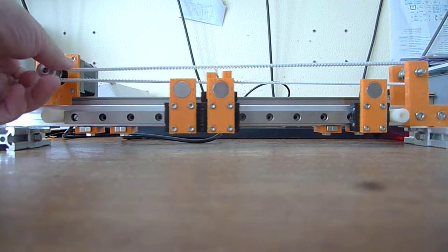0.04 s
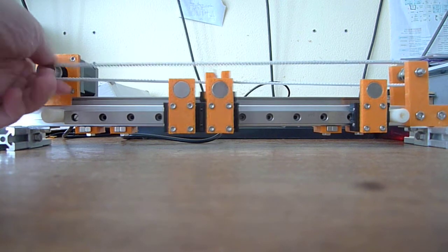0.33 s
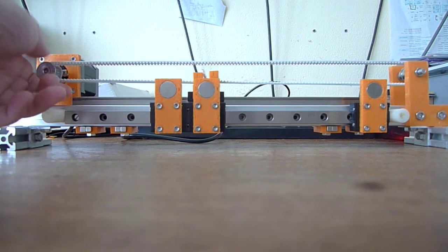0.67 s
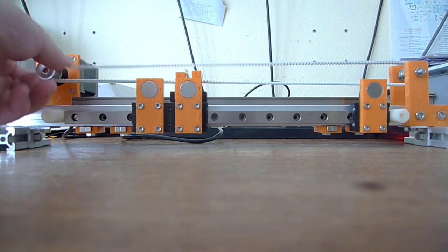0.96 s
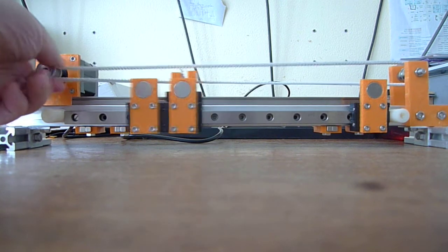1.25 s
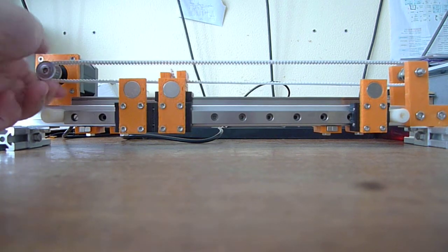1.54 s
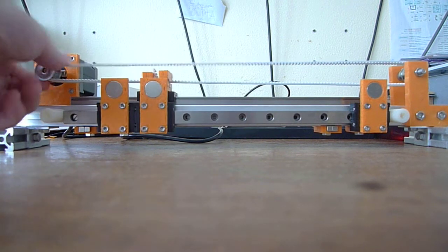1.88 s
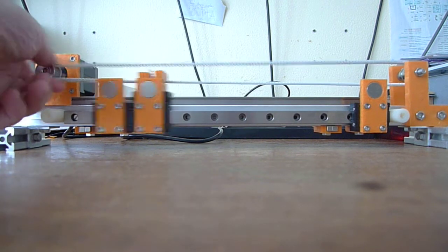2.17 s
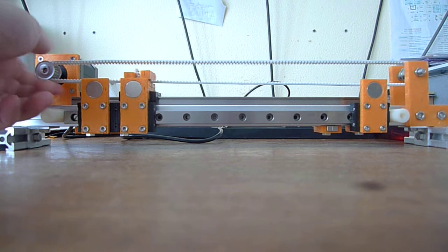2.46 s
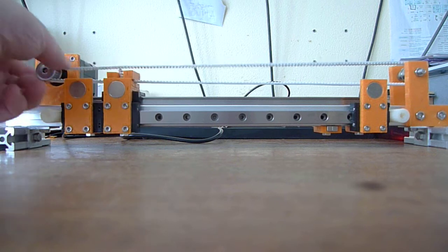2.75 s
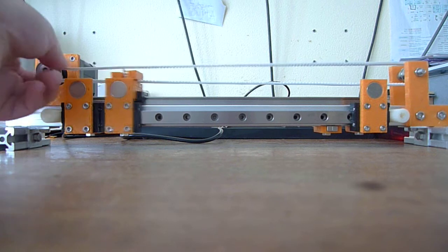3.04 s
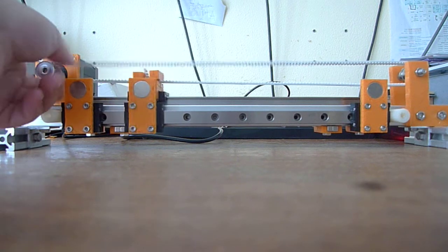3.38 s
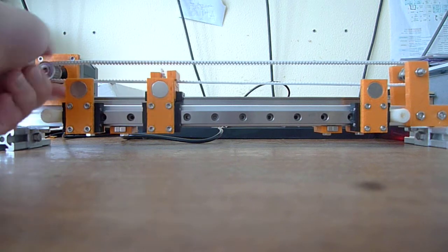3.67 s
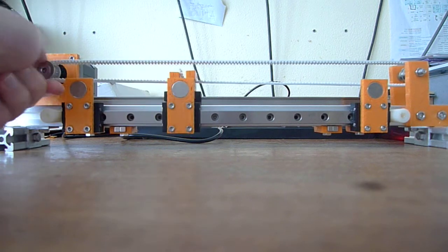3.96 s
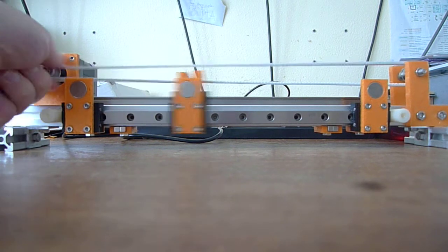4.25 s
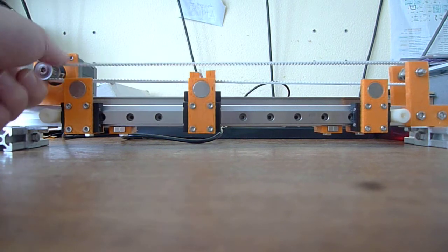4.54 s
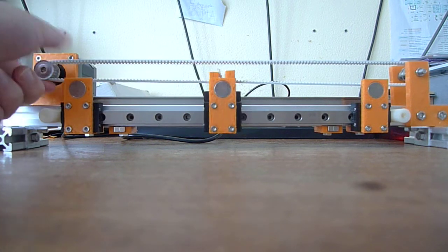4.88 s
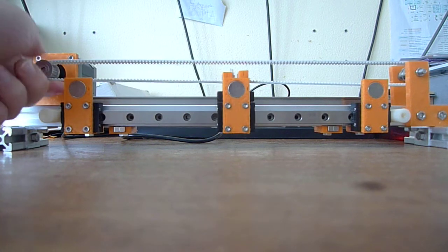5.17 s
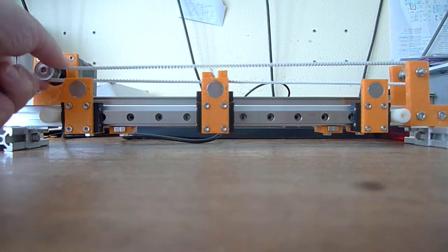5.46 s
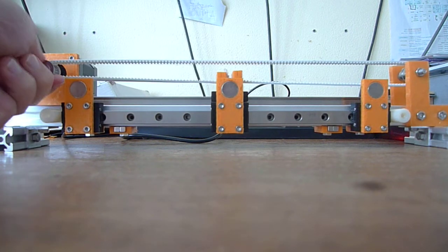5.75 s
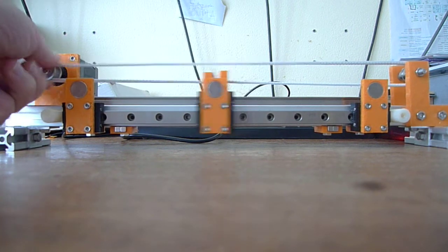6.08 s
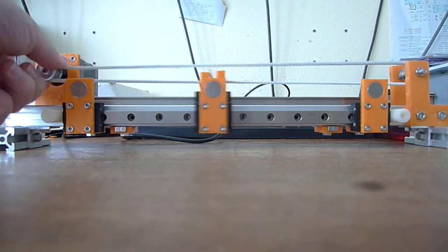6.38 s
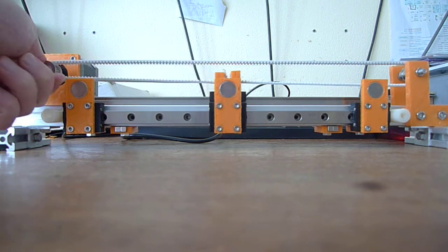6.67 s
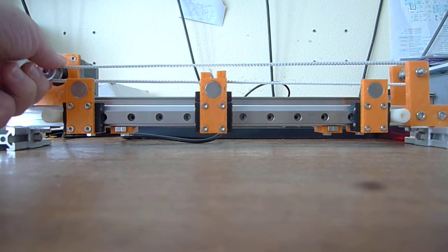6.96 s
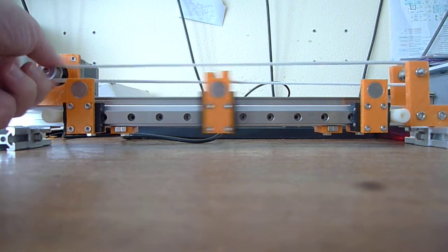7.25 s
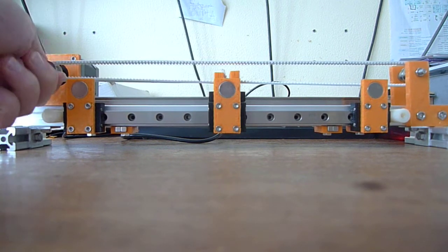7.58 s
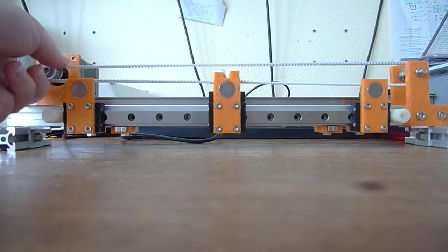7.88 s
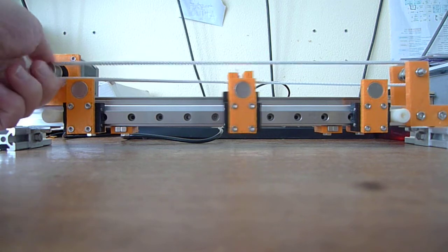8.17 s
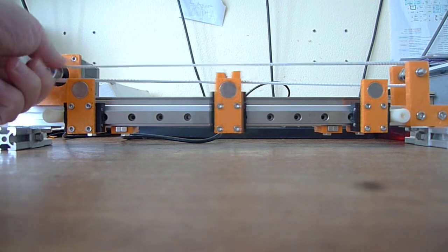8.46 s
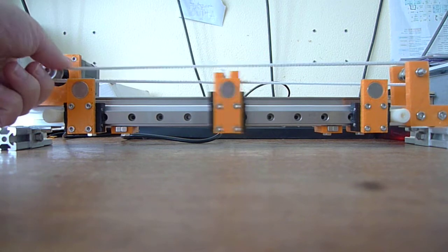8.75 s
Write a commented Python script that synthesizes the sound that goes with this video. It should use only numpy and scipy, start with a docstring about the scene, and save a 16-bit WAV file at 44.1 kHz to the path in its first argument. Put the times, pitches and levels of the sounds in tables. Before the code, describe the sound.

In a small room, a toothed belt drive is turned by hand in quick spurts. The motor makes brief zipping tones that sweep up and down while the belt rumbles and carriages rattle along a metal rail. Sharp knocks come now and then early on, the motor judders most near the middle, and one more soft knock comes late. A faint hum and hiss lie underneath.

```python
"""From the start, fingers twist the pulley of an unpowered stepper motor in short turns. With each twist
the rotor's magnetic bumps (cogging) make a tone that sweeps up and down through the frame's resonances,
a toothed belt rumbles, and bearing balls rattle as it drags carriages along a steel rail on a desk.
From about 1 to 4 seconds the carriages knock together now and then. The motor judders most near 4 seconds,
then runs more smoothly, with one more knock near 8. A small room, a low hum and hiss are heard all along."""
import sys
import numpy as np
from scipy import signal
from scipy.fft import rfft, irfft, next_fast_len
from scipy.io import wavfile
from scipy.ndimage import uniform_filter1d

SR = 44100
rng = np.random.default_rng(int(sys.argv[2]) if len(sys.argv) > 2 else 0)


def pcm_store(signal):
    """Save signal as 16-bit PCM."""
    levels = np.round(np.clip(np.atleast_2d(signal), -1, 1) * 32767)
    wavfile.write(sys.argv[1], SR, levels.astype(np.int16).T)


N = 388962
TIME = np.arange(N) / SR

# The notes a carriage rings with. Each row: pitch in Hz, level in dB, seconds to fade by 60 dB.
CARRIAGE_NOTES = [(950, -9.5, 0.011), (1180, -19.5, 0.032), (1746, -9, 0.032), (2240, -12.5, 0.022),
                  (2275, -3.5, 0.017), (2500, -4, 0.017), (2763, -3, .018), (2995, -15, 0.061),
                  (3017, -17.5, 0.067), (3150, -19.5, 0.077), (3270, -18, 0.1), (3410, -20.5, 0.052),
                  (3580, -20, 0.041), (3735, -11, 0.013), (4300, -10.5, 0.0057)]


def motor(rate_hz, half_db=-0.5, double_db=-16, wobble=0.0565):
    """The rotor snaps past its magnetic resting spots: a tone, with weaker ones an octave down and up."""
    # The rotor judders most while both carriages are dragged. Each row: time in seconds, roughness 0 to 1.
    judder = [(0, 0.25), (1.3, 0.25), (2.7, 0.37), (3.1, 0.48), (3.9, .6), (5.0, 0.51), (5.7, 0.2),
              (6.2, 0.14), (8.82, 0.22)]
    # The motor sings out at the frame's main resonances. Each row: cogging rate in Hz, gain in dB.
    gain_by_rate = [(150, -2.5), (290, -3), (435, 1.2), (525, -1.5), (625, 1.5), (740, -2), (900, -1.5),
                    (1250, -2.3)]
    rough = np.interp(TIME, *np.transpose(judder))
    phase = 2 * np.pi * np.cumsum(rate_hz * (1 + wobble * rough * drift(250))) / SR
    torque = np.sin(phase) + from_db(half_db) * np.sin(phase / 2) + from_db(double_db) * np.sin(2 * phase)
    torque *= 1 + rough * drift(300)
    tone = evened(frame(torque), window_s=0.025, slack=0.032)
    return tone * from_db(np.interp(rate_hz, *np.transpose(gain_by_rate)))


def belt(boom_db, boom_hz=194, flutter_db=0.97):
    """Belt teeth seat unevenly on the pulley and shake the frame, at times with more low boom."""
    # The tone of the teeth's push. Each row: frequency in Hz, level in dB.
    spectrum = [(40, 3), (80, -33.5), (130, 7.5), (250, 7.5), (450, -10.5), (680, -14), (800, -14),
                (1300, -26)]
    force = coloured(grains(900, spread_db=0.5), spectrum)
    low = signal.sosfiltfilt(signal.butter(6, boom_hz, fs=SR, output="sos"), force)
    rumble = evened(frame(force + (from_db(boom_db) - 1) * low), window_s=0.048, slack=0.18)
    return rumble * from_db(flutter_db * drift(55))


def bearings(rate_hz, ring_share=0.27, flutter_db=1.9):
    """Balls jostle in their tracks, more often the faster the carriage slides, and set it ringing."""
    # The tone of the rattle. Each row: frequency in Hz, level in dB.
    spectrum = [(300, 4), (700, 1), (900, -1.5), (1250, -0.5), (1700, -0.5), (2200, -4.5), (2600, -8.5),
                (3100, -4.5), (3800, -6), (4500, -15.5), (5300, -34), (8000, -51.5)]
    ticks_per_s = 600 + 2.5 * rate_hz
    ticks = rms_one(grains(ticks_per_s, spread_db=2.5) / np.sqrt(ticks_per_s))
    ringing = rms_one(sum(from_db(db) * ring(ticks, hz, fade_s) for hz, db, fade_s in CARRIAGE_NOTES))
    return coloured(ticks + ring_share * ringing, spectrum) * from_db(flutter_db * drift(170))


def knocks(ring_db=-4.5, thud_db=40.0, contact_s=0.00036, dull_hz=4600, bounce_s=0.0016, bounce_db=-6.5):
    """Each knock chatters for a moment, rings the carriage and thuds into the frame."""
    # Carriages and pulley knocking. Each row: start in seconds, level in dB, extra thud in dB,
    # brightness in dB per octave.
    hits = [(1.3432, -33, -10, -8.5), (1.7131, -41.5, 13, -3), (1.8276, -23, -4, 5), (2.225, -34.5, 6, -18),
            (2.2575, -25, 5.5, 5.5), (2.692, -29.5, 8.5, -5), (2.7072, -25, -1.5, -10.5),
            (3.028, -37, 5, 0), (3.0613, -37.5, 8, 6.5), (3.4746, -48, -1, 19), (3.514, -46, 5, 3),
            (3.836, -51, 16, -1), (4.234, -55, -19, 3), (7.682, -44, 6, -11)]
    start_s, level_db, extra_thud_db, brightness = np.transpose(hits)
    touches = np.arange(4)  # the first touch, then three quick, weaker bounces
    jitter = rng.uniform(-0.35, 0.3, (len(hits), len(touches))) * (touches > 0)
    at = ((start_s[:, None] + bounce_s * (touches + jitter)) * SR).astype(int)
    sound = np.zeros(N)
    for hz, db, fade_s in CARRIAGE_NOTES:
        strength_db = level_db + db + ring_db + brightness * np.log2(hz / 2200)
        clicks = np.zeros(N)
        clicks[at] = from_db(strength_db[:, None] + bounce_db * touches) * rng.choice([-1, 1], at.shape)
        sound += ring(clicks, hz, fade_s)
    push = np.zeros(N)
    push[at[:, 0]] = from_db(level_db + extra_thud_db + thud_db)
    soft = np.exp(-1 / (contact_s * SR))  # plastic faces soften the blow
    sound += frame(signal.lfilter([1 - soft], [1, -soft], push))
    return signal.sosfilt(signal.butter(6, dull_hz, fs=SR, output="sos"), sound)


def frame(force, low_hz=117, high_hz=669):
    """Frame and desk sound hollow, in a narrow band; the steel rail rings faintly above it."""
    # Resonances of the frame with the desk, and of the rail. Each row: pitch in Hz, width in Hz, gain in dB.
    frame_notes = [(137.2, 8, -1), (181, 5.7, 1.5), (219, 73, -12.5), (258.5, 6.7, -1.5), (315.6, 26, -6),
                   (349.7, 16, -3.5), (435.9, 30, 5.5), (484, 15, -0.5), (552.4, 71, -6.5), (603, 27, 0.5),
                   (628.6, 60, -5.5), (662, 5.1, -15)]
    rail_notes = [(1248, 41, -1), (1370, 260, -12), (1710, 90, -31)]
    cut_lows = signal.butter(3, low_hz, "high", fs=SR, output="sos")
    cut_highs = signal.butter(8, high_hz, fs=SR, output="sos")
    hollow = signal.sosfilt(np.vstack([cut_lows, cut_highs]), resonances(force, frame_notes))
    return hollow + resonances(force, rail_notes)


def cogging_rate(top_s, top_hz, rise_s, fall_s, creep_hz=92.44, roundness=2.05):
    """Magnetic bumps per second: a rounded hump for each twist, and a slow creep in between."""
    t, rate = TIME[::20], creep_hz
    for s, hz, rise, fall in zip(top_s, top_hz, rise_s, fall_s):
        away = np.abs((t - s) / np.where(t < s, rise, fall))
        hump = np.exp(-np.minimum(away, 10) ** roundness)
        rate = np.maximum(rate, creep_hz + (hz - creep_hz) * hump)
    return np.interp(TIME, t, rate)


def swell(top_s, level_db, before_s, after_s, rise_db_per_s, fall_db_per_s, rest_db, lean_db=0):
    """A gain that rises, holds from before_s ahead of each top speed to after_s past it, then falls."""
    t, db = TIME[::20], rest_db
    for s, full_db, before, after, lean in np.broadcast(top_s, level_db, before_s, after_s, lean_db):
        early, late = np.maximum(s - before - t, 0), np.maximum(t - s - after, 0)
        tilt_db = lean * np.clip((t - s) / 0.012, -1, 1)  # complete 12 ms either side of top speed
        db = np.maximum(db, full_db + tilt_db - rise_db_per_s * early - fall_db_per_s * late)
    return np.interp(TIME, t, from_db(db))


def room(x, echo_db, fade_s=0.28):
    """Dense echoes from the desk and near walls die away."""
    t = TIME[:SR // 2]
    tail = rng.standard_normal(len(t)) * from_db(-60 * t / fade_s) * (t > 0.003)
    return x + from_db(echo_db) * signal.fftconvolve(x, tail / np.linalg.norm(tail))[:N]


def background(noise_db=-51.5):
    """Room rumble, microphone hiss, a steady hum and a faint electrical whine."""
    # The hum and whine. Each row: pitch in Hz, average level in dB.
    tones = [(52, -66), (4389, -79.5), (6222, -89.5)]
    # The tone of the rumble and hiss. Each row: frequency in Hz, relative level in dB.
    spectrum = [(20, -49.5), (40, 3), (56, 6), (90, -0.5), (190, 6), (300, 0.5), (470, -1), (600, -0.5),
                (740, -4.5), (1500, -9.5), (3200, -13.5), (4400, -23.5), (7500, -24), (8300, -29)]
    hum = sum(from_db(db) * np.sqrt(2) * np.sin(2 * np.pi * (hz * TIME + rng.random())) for hz, db in tones)
    return hum + from_db(noise_db) * coloured(rng.standard_normal(N), spectrum)


def from_db(db):
    """Turn decibels into a gain."""
    return 10 ** (np.asarray(db) / 20)


def rms_one(x):
    """Scale a signal to an average power of 1."""
    return x / np.sqrt(np.mean(x ** 2) + 1e-20)


def coloured(x, spectrum):
    """Shape a signal's lows and highs along a curve of (Hz, dB) points; its power comes out as 1."""
    hz, db = np.transpose(spectrum)
    size = next_fast_len(N)
    bins_hz = np.maximum(np.fft.rfftfreq(size, 1 / SR), 1)
    gain = from_db(np.interp(np.log(bins_hz), np.log(hz), db))
    return rms_one(irfft(rfft(x, size) * gain, size)[:N])


def drift(per_s):
    """A random wander, about 1 in size, that changes course per_s times a second."""
    points = rng.standard_normal(N // 10)
    return rms_one(np.interp(TIME * per_s, np.arange(len(points)), points))


def grains(per_s, spread_db):
    """Tiny impacts of uneven size at random moments."""
    sizes = from_db(spread_db * np.minimum(rng.exponential(1, N), 4)) * rng.choice([-1, 1], N)
    return sizes * (rng.random(N) < per_s / SR)


def ring(x, hz, fade_s):
    """Each click starts a pure tone that fades by 60 dB in fade_s seconds."""
    decay, step = from_db(-60 / (fade_s * SR)), 2 * np.pi * hz / SR
    return signal.lfilter([0, np.sin(step)], [1, -2 * decay * np.cos(step), decay ** 2], x + 1e-18)


def resonances(force, notes):
    """One force shakes several resonances side by side, with dips between them."""
    sound = np.zeros(N)
    for hz, width_hz, db in notes:
        decay = np.exp(-np.pi * width_hz / SR)
        gain = (1 - decay ** 2) / 2 * from_db(db)
        feedback = [1, -2 * decay * np.cos(2 * np.pi * hz / SR), decay ** 2]
        sound += signal.lfilter([gain, 0, -gain], feedback, force + 1e-18)
    return sound


def evened(x, window_s, slack):
    """Even out the loudness, but keep the brief swell at each resonance."""
    x = rms_one(x)
    local_power = uniform_filter1d(x ** 2, int(window_s * SR))
    return x * np.sqrt((1 + slack) / (local_power + slack))


def scene():
    """The twists drive motor, belt and bearings; they and the knocks sound in the same small room."""
    # Twists of the pulley, a few in two pushes. Each row: time of top speed in seconds, top cogging rate
    # in Hz, seconds speeding up, seconds slowing down, motor level in dB, its lean in dB (above 0, fingers
    # press harder late), belt level in dB, bearing level in dB, belt boom in dB, seconds the belt is taut
    # before top speed, seconds it shudders after.
    twists = [(0.007, 503.0, 0.038, 0.023, -28.5, -6.5, -37.5, -50, -1.5, 0.03, 0.067),
              (0.404, 606.0, 0.06, 0.055, -33.5, 2.5, -36.5, -47.5, -14, 0.0088, 0.081),
              (0.844, 840.0, 0.05, 0.038, -32, -0.5, -38, -43, -2.3, 0.054, 0.066),
              (1.254, 457.0, 0.018, 0.056, -32.5, 1.5, -36.5, -48.5, -9, 0.013, 0.085),
              (1.364, 729.3, 0.059, 0.034, -32.5, 1.5, -38.5, -45.5, 4.5, 0.055, 0.049),
              (1.731, 742.6, 0.051, 0.055, -34.5, -2.5, -36, -42, -9, 0.051, 0.097),
              (2.204, 690.7, 0.04, 0.031, -33, -1, -47, -44.5, -1, 0.06, 0.01),
              (2.249, 1038, 0.04, 0.023, -32.5, 4.5, -37.5, -39, -3.5, 0.027, 0.066),
              (2.657, 647, 0.026, 0.03, -31.5, 1.5, -40, -45, -7, 0.031, 0.01),
              (2.697, 1084, 0.04, 0.034, -30, 3.5, -32.5, -40, -13.5, 0.011, 0.053),
              (3.036, 718.0, 0.013, 0.045, -35, -2, -42, -64, -3.8, 0.0052, 0.06),
              (3.101, 592.0, 0.042, 0.084, -32.5, -1.5, -33.5, -41.5, -5, 0.039, 0.06),
              (3.288, 269.0, 0.029, 0.021, -39.5, -1, -49, -68, 2.7, 0.031, 0.15),
              (3.494, 829.0, 0.031, 0.03, -31.5, -3, -31.5, -42, -12, 0.027, 0.059),
              (3.565, 478.0, 0.044, 0.043, -33, -1, -43, -51.5, 8, 0.04, 0.096),
              (3.887, 544.0, 0.028, 0.092, -40.0, -1, -30, -43, -16, 0.038, 0.013),
              (4.288, 1236.0, 0.038, 0.029, -31, -1, -42, -40.4, -5.5, 0.064, 0.096),
              (4.416, 252.0, 0.024, 0.031, -55, 2, -45.5, -64.3, -2.5, 0.024, 0.025),
              (4.657, 555.0, 0.038, 0.095, -34, -0.5, -41.5, -44, -9, 0.032, 0.057),
              (5.03, 562.0, 0.033, 0.037, -37.5, 2.5, -38, -45.5, 2.3, 0.03, 0.092),
              (5.363, 214.0, 0.019, 0.019, -46, 9, -39, -63, 4, 0.01, 0.019),
              (5.433, 1259.0, 0.037, 0.043, -31.5, -1.5, -33, -41.5, -4, 0.046, 0.045),
              (5.66, 696.0, 0.048, 0.054, -38, 3.5, -37.3, -47, 0, 0.024, 0.067),
              (5.887, 707.0, 0.036, 0.043, -37.5, -3.5, -37.5, -49, -6.5, 0.016, 0.058),
              (5.937, 549.0, 0.032, 0.041, -34, -1, -38, -49.5, 7, 0.029, 0.073),
              (6.151, 657.7, 0.068, 0.053, -36.5, 4, -38.5, -49, 5, 0.056, 0.073),
              (6.368, 894.0, 0.045, 0.032, -31, 1.5, -36.8, -44.5, -1, 0.039, 0.064),
              (6.593, 776.0, 0.048, 0.047, -39, 3, -40.2, -47.5, 0.5, 0.053, 0.071),
              (6.829, 811.0, 0.046, 0.028, -35.0, -0.5, -37.5, -47.1, -10.5, 0.037, 0.051),
              (7.064, 691.0, 0.044, 0.049, -37, 0.5, -42, -49.5, 0.7, 0.049, 0.075),
              (7.271, 882.0, 0.039, 0.033, -34, -0.5, -43.5, -46.5, -3.5, 0.043, 0.086),
              (7.501, 810.0, 0.04, 0.033, -38, -1, -38.5, -48.5, 4.3, 0.055, 0.04),
              (7.777, 185.0, 0.026, 0.031, -45.5, -3, -50, -73, 1.5, 0.031, 0.027),
              (7.993, 806.0, 0.036, 0.045, -35.5, -2, -39, -48.5, 4.5, 0.037, 0.074),
              (8.243, 617.0, 0.054, 0.06, -35.5, 0.5, -39.5, -49.5, 3.5, 0.056, 0.11),
              (8.494, 899.0, 0.042, 0.038, -34, 2, -43, -47, -2.7, 0.049, 0.088),
              (8.709, 928.0, 0.054, 0.034, -33, -1, -38.5, -47, 1.2, 0.062, 0.059),
              (8.782, 473.0, 0.037, 0.057, -41.2, -5, -43, -68, 10, 0.044, 0.06)]
    (top_s, top_hz, rise_s, fall_s, motor_db, lean_db,
     belt_db, bearing_db, boom_db, taut_s, shudder_s) = np.transpose(twists)
    rate_hz = cogging_rate(top_s, top_hz, rise_s, fall_s)
    motor_gain = swell(top_s, motor_db, 0.7 * rise_s, 0.38 * fall_s,
                       rise_db_per_s=848, fall_db_per_s=235, rest_db=-63, lean_db=lean_db)
    belt_gain = swell(top_s, belt_db, taut_s, 0.93 * shudder_s,
                      rise_db_per_s=801, fall_db_per_s=167.5, rest_db=-57.5)
    bearing_gain = swell(top_s, bearing_db, 0.26 * rise_s, 0.25 * fall_s,
                         rise_db_per_s=284.5, fall_db_per_s=218, rest_db=-73.5)
    tone = motor_gain * motor(rate_hz)
    rumble = belt_gain * belt(np.interp(TIME, top_s, boom_db))
    rattle = bearing_gain * bearings(rate_hz)
    machine = room(tone + rumble, echo_db=-15.5) + room(rattle, echo_db=-15) + room(knocks(), echo_db=-6)
    return (machine + background())[None]


def record(dry):
    """The microphone passes only 36 to 8300 Hz, and its signal rests slightly below zero."""
    sound = signal.sosfilt(signal.butter(4, 36, "high", fs=SR, output="sos"), dry)
    return signal.sosfiltfilt(signal.butter(16, 8300, fs=SR, output="sos"), sound - 0.0062)


dry = scene()
out = record(dry)
pcm_store(out)
```